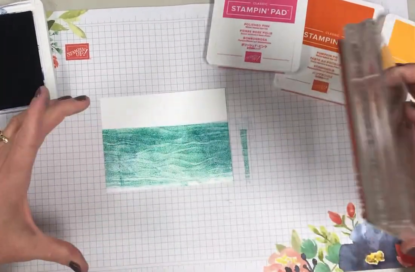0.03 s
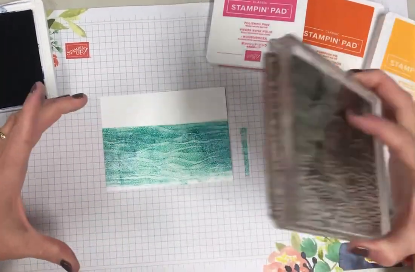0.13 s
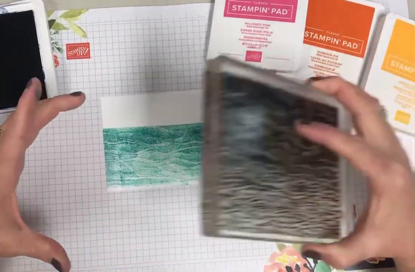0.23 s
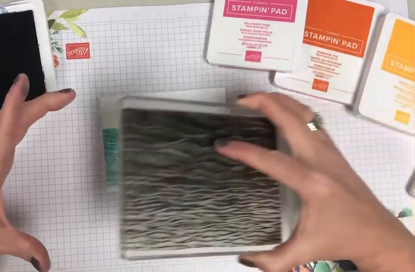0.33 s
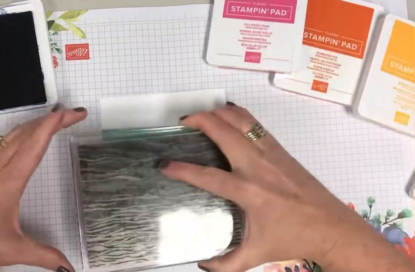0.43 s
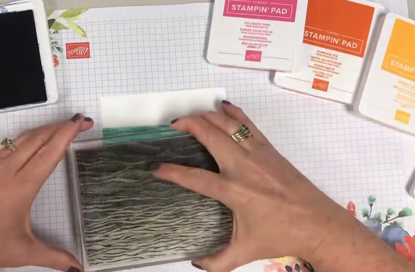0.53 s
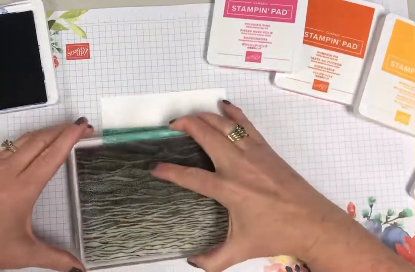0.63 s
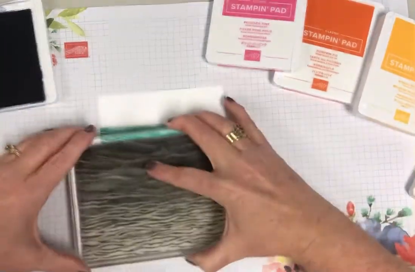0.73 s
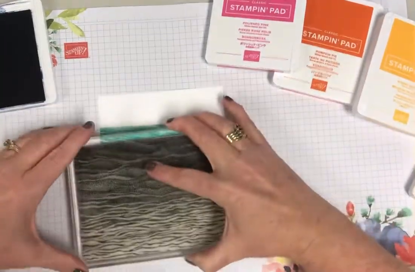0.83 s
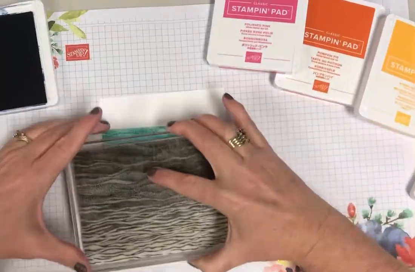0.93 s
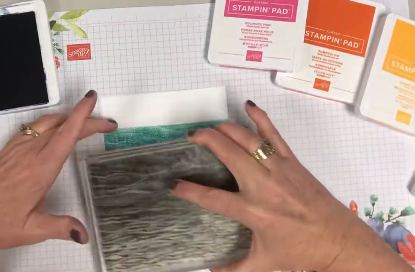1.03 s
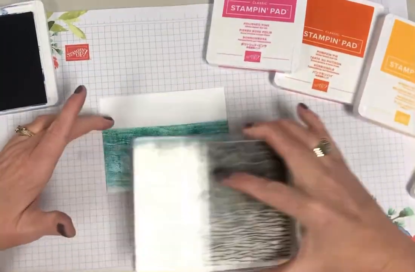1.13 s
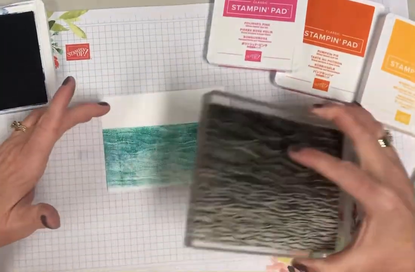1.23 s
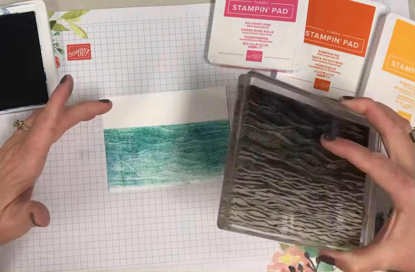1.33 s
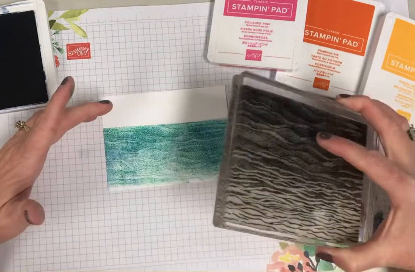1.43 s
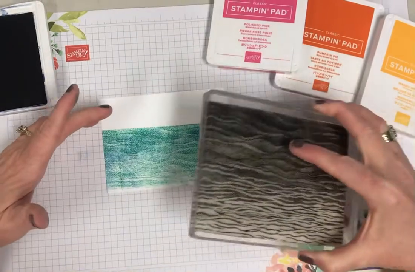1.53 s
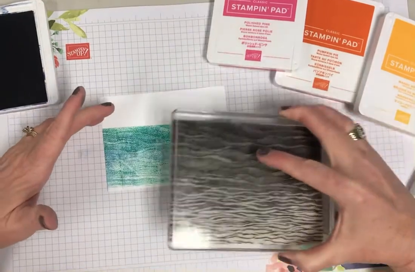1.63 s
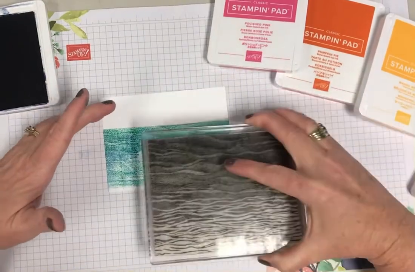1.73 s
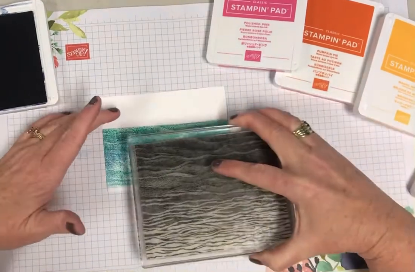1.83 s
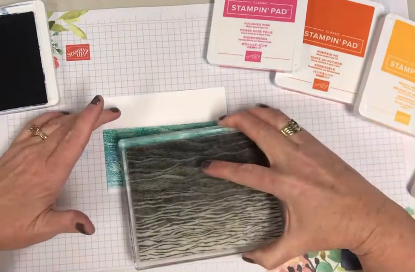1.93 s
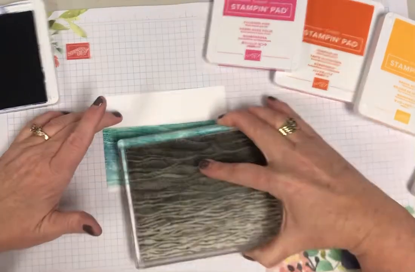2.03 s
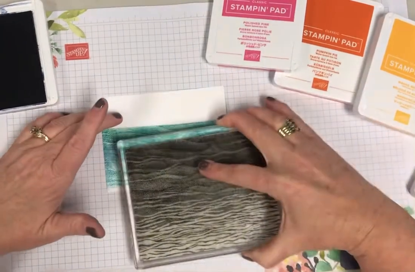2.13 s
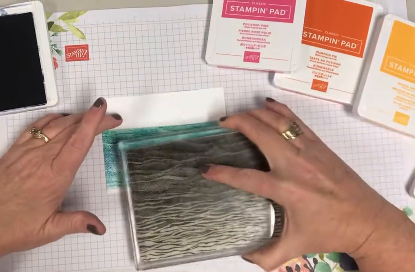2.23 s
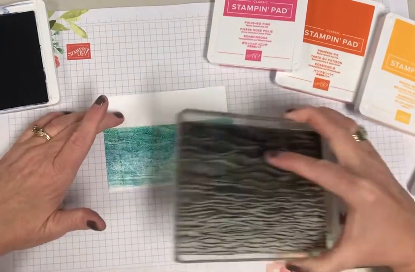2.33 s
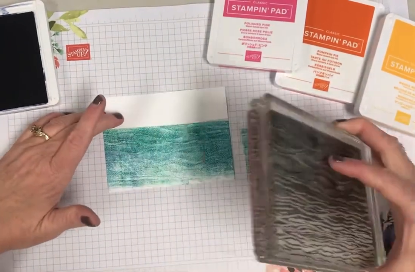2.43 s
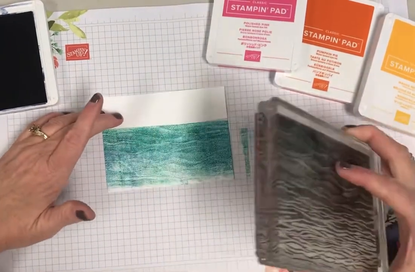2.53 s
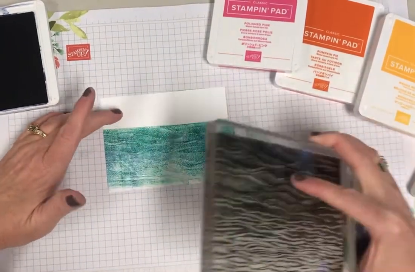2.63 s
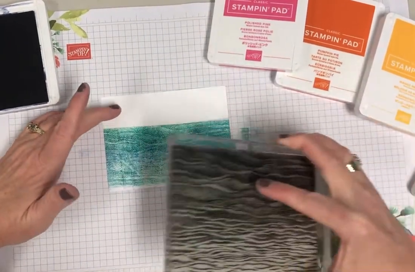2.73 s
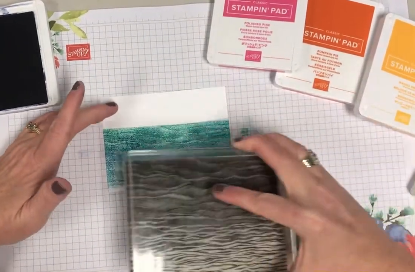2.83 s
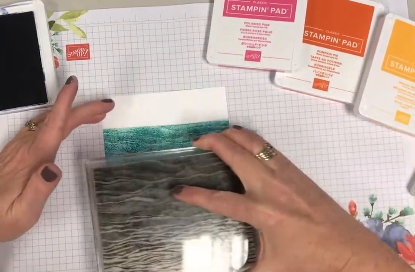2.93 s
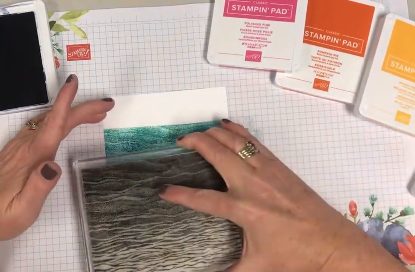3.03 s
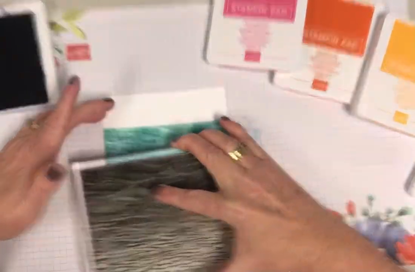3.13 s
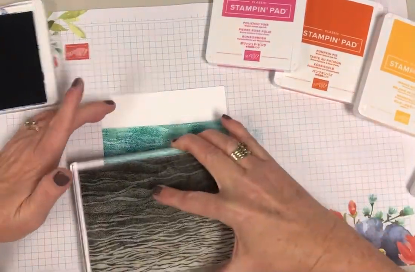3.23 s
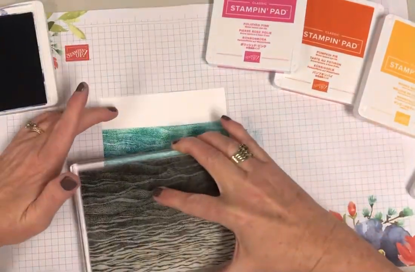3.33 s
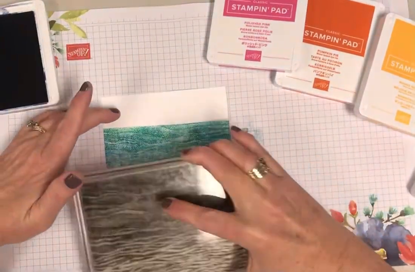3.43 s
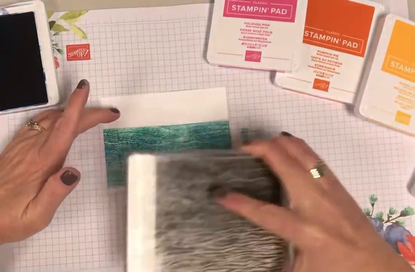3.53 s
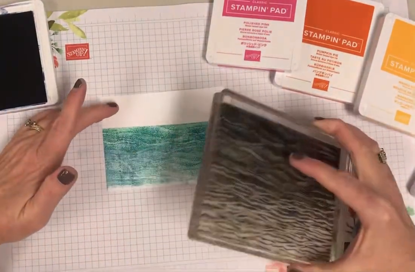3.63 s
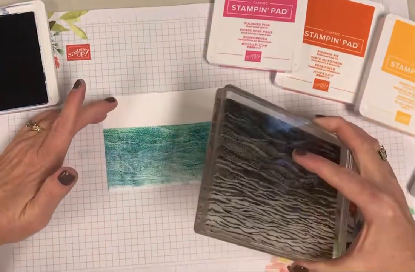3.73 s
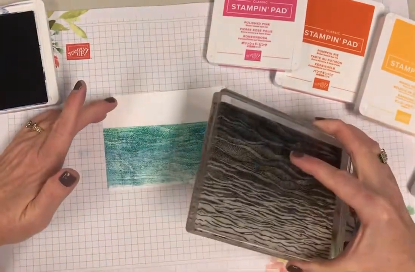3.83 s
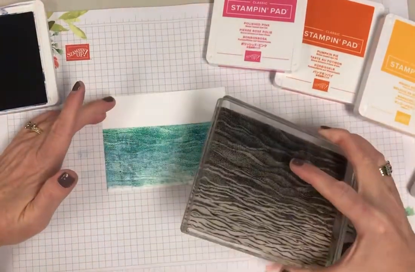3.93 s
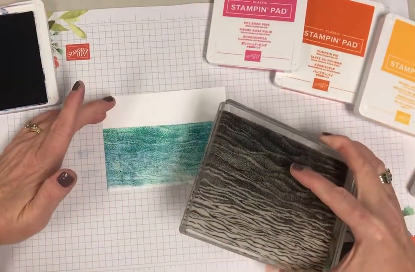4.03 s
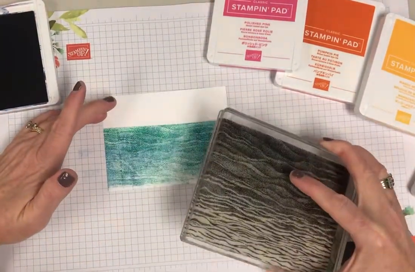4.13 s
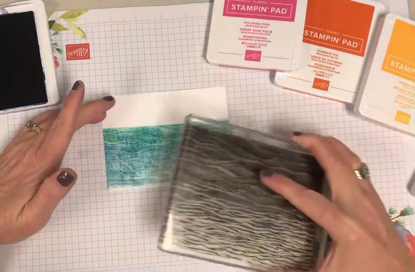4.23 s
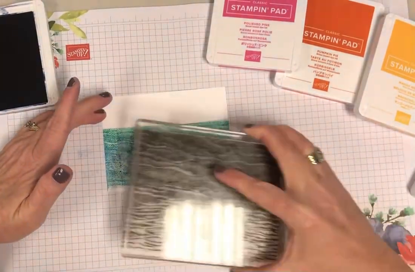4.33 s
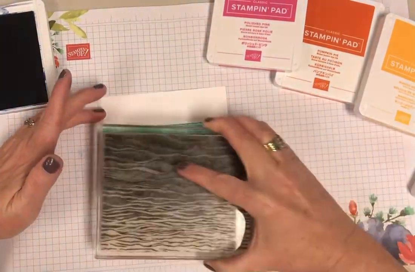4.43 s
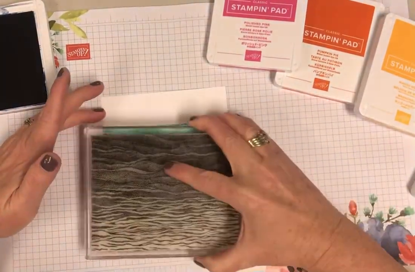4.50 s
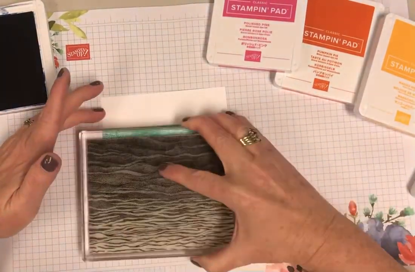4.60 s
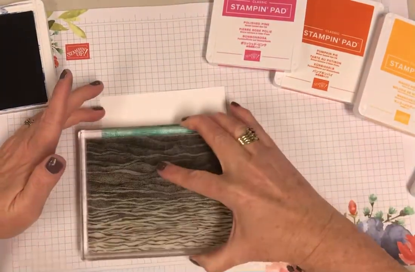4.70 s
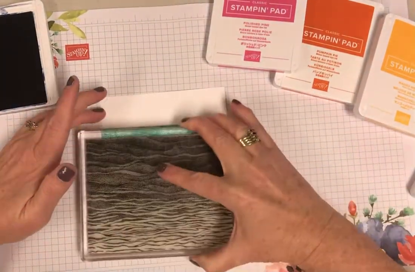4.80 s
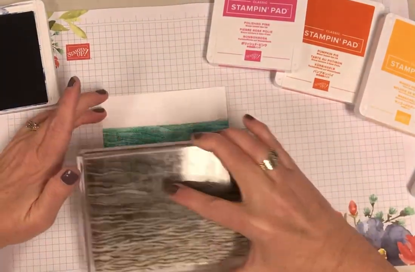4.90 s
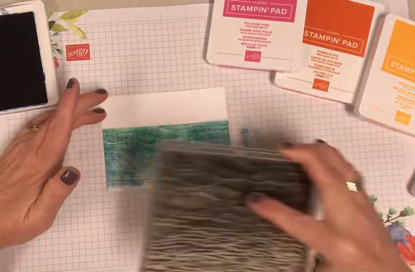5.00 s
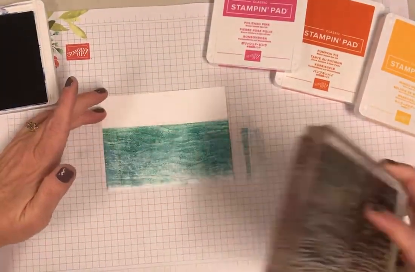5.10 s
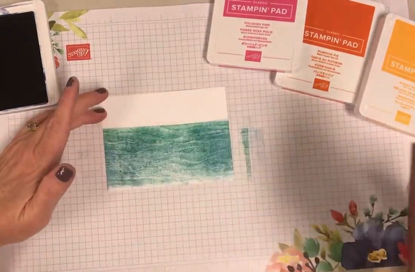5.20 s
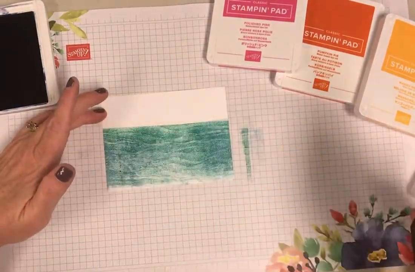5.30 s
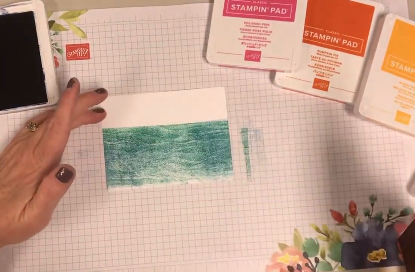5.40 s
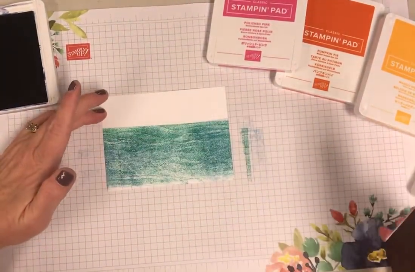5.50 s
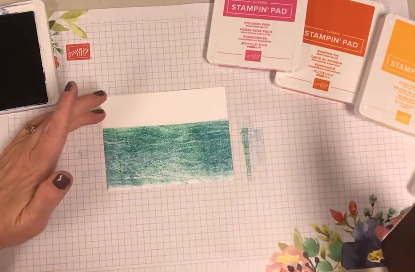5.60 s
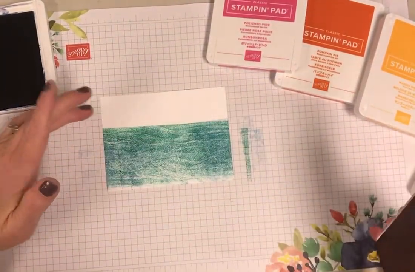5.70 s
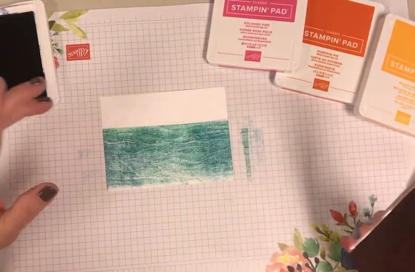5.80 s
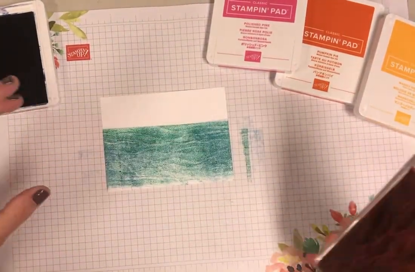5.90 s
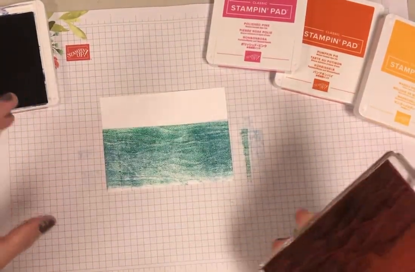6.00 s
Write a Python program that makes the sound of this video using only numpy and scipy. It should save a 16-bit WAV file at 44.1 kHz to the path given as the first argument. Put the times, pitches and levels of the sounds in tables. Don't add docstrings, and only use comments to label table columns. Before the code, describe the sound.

A rubber stamp on a heavy plastic block thuds onto card four times, with papery rubs and faint ticks, then a sharp snap.

```python
import sys
import numpy as np
from scipy import signal
from scipy.fft import rfft, irfft, next_fast_len
from scipy.io import wavfile
from scipy.ndimage import uniform_filter1d

SR = 44100
rng = np.random.default_rng(int(sys.argv[2]) if len(sys.argv) > 2 else 0)


def volts_from_db(level):
    exponent = np.asarray(level, float) / 20
    return 10 ** exponent


def inscribe(sig):
    pcm = np.round(np.clip(np.atleast_2d(sig).T, -1, 1) * 32767)
    wavfile.write(sys.argv[1], SR, pcm.astype(np.int16))


N = 267025

# (frequency [Hz], density [dB per Hz])
AIR_COLOUR = [(47, -20), (80, 2.5), (329, -11), (429, -10.5), (458, -14.5), (761, -17), (1110, -14),
              (1610, -20), (3340, -25.5), (15700, -29.5)]
# (time [s], level [dB])
TABLE_SWAYS = [
    (2.24, -59),
    (3.34, -58),
    (4.85, -70),
    (5.48, -59),
]
# (time [s], ring level [dB], first ring [Hz], second ring [Hz], click level [dB])
NAIL_TICKS = [
    (.063, -60.5, 5900, 3700, -72),
    (0.272, -54, 2700, 5840, -55),
    (1.811, -70, 3060, 6000, -61),
    (2.5301, -47, 1300, 1176, -60),
    (2.5296, -53.5, 3700, 5600, -66),
    (5.0135, -57.5, 1020, 1080, -71),
    (5.9305, -63, 11700, 14000, -54.5),
]
# (frequency [Hz], t60 [s])
ROOM_DECAY = [(150, 0.62), (400, 0.53), (1000, 0.52), (3500, 0.63), (7000, 0.51), (13000, 0.39)]
# (start [s], length [s], rising share [0-1], level [dB], fibre gain [dB])
PAPER_RUBS = [(0.184, 0.38, 0.46, -64, -7), (0.752, 0.13, 0.31, -68, -4), (.84, .14, 0.27, -61.5, -3),
              (.95, 0.084, 0.4, -65.5, -3.5), (1.044, 0.33, 0.206, -60, -3.5),
              (1.694, 0.54, 0.25, -76, -1.5), (2.23, 0.32, .3, -70.5, -0.5),
              (2.582, 0.56, 0.3, -70.5, -3.5), (3.361, 0.33, 0.25, -68.5, -2.5),
              (4.218, 0.34, 0.35, -73.5, -1), (4.779, 0.072, .2, -74, -15), (4.86, 0.2, 0.29, -75, 2)]
# (frequency [Hz], density [dB per Hz])
SCUFF_COLOUR = [(300, -5.5), (900, -2), (2800, 0), (4200, 1), (6500, -1.5), (9000, -25)]
# (frequency [Hz], density [dB per Hz])
FIBRE_COLOUR = [(4500, -23), (7000, 0.5), (10500, 1), (16000, -5.5)]
# (time [s], level [dB], length [ms])
AIR_BURSTS = [(0.645, -50.5, 9.9), (0.657, -46, 15.6), (0.668, -43, 12.7), (.684, -44.5, 18.3),
              (0.772, -54, 20), (0.786, -56.5, 20), (.882, -57, 11.5), (.99, -55, 15), (1.941, -54.5, 12),
              (1.954, -49, 17), (1.9598, -35.5, 7.1), (1.9699, -29, 8.5), (1.982, -28.5, 9.4),
              (1.995, -54, 7), (2.187, -54.5, 4.8), (3.1088, -35.5, 13.4), (3.12, -17.5, 3.15),
              (3.13, -33.5, 10.1), (3.14, -47, 14), (3.301, -56, 6), (3.309, -50, 3.6),
              (4.5833, -48.5, 13.6), (4.601, -52.5, 6.4), (4.615, -56, 3.3), (4.786, -64.5, 14)]
# (frequency [Hz], density [dB per Hz])
SLAP_COLOUR = [(290, -23.5), (500, 0.5), (638, -5.5), (1290, -11), (1650, -12), (1850, -19), (2970, -16),
               (5430, -22.5), (7780, -35), (8720, -38.5), (15500, -44)]
# (frequency [Hz], density [dB per Hz])
HISS_COLOUR = [(2500, -47), (5500, -11), (9000, 1.5), (16000, -13)]
# (time [s], landing level [dB], peeling level [dB])
LANDING_HISS = [
    (.6, -13.5, -19),
    (1.9, -19, -4.5),
    (3.05, -17.5, -8.5),
    (4.5, -11.5, -2),
]
# (frequency [Hz], width [Hz], level [dB])
BLOCK_RINGS = [(6000, 420, -1), (9200, 220, -1.5), (13800, 200, 7.5)]
# (time [s], force [dB], softness [ms])
LANDING_PUSHES = [(0.6515, -19.5, 0.62), (0.6606, -28.3, 0.38), (0.6645, -9.6, 1.43), (0.6699, 0.1, 2.0),
                  (0.6816, -24.0, 0.39), (0.6993, -31.2, 0.17), (1.9466, -12.1, 1.74),
                  (1.9564, -14.9, 1.17), (1.963, -12.6, 0.17), (1.9743, -10.7, 0.54), (1.9814, -14.3, 0.52),
                  (3.1159, -7.8, 0.17), (3.122, -17.2, 0.25), (4.5851, -25.7, 1.27), (4.5921, -19.8, 0.87),
                  (4.5968, -7.7, 2.0), (4.6051, -15.4, 0.88), (4.6106, -8.5, 1.52), (4.6205, -24.7, 0.39)]
# (time [s], force [dB], softness [ms])
ROCKING_PUSHES = [(0.785, -37, 0.15), (0.871, -46.5, 0.17), (.925, -47.5, 0.12), (.992, -47, .18),
                  (1.006, -41, 0.24), (1.022, -43, 0.12), (1.043, -54, 0.13), (2.101, -24.5, 1.64),
                  (2.189, -34, 0.59), (2.341, -46, 0.89), (3.234, -30, 0.83), (3.311, -34.5, 1.3),
                  (3.47, -38.5, 1.9), (4.788, -39, 0.91), (5.0, -50.5, 0.48)]
# (frequency [Hz], level [dB], t60 [s], side of the node line [+1 or -1])
TABLE_MODES = [(45.5, -13.5, 0.28, 1), (60.4, -34.8, 0.8, -1), (86.7, 10.5, 0.09, -1),
               (95.5, 8.3, 0.086, 1), (100.4, -18.7, 0.688, 1), (109.0, -11.6, 0.239, 1),
               (137.5, -20.8, 0.165, -1), (149.6, -29.2, 0.261, 1), (160.3, -37.5, 0.8, 1),
               (176.5, 1.8, 0.029, 1), (182.4, -23.3, 0.182, -1), (197.8, -35.0, 0.79, 1),
               (220.9, -22.2, 0.287, 1), (244.7, -28.6, 0.351, 1), (261.2, -17.4, 0.132, 1),
               (289.7, -20.9, 0.216, 1), (307.1, -45.8, 0.702, 1), (323.0, -17.6, 0.056, -1),
               (379.4, -7.7, 0.02, 1), (385.0, -13.0, 0.073, -1), (419.1, -20.6, 0.112, -1),
               (448.9, -27.3, 0.159, -1), (532.0, -23.8, 0.115, 1), (543.4, -13.8, 0.037, -1),
               (656.0, -32.3, 0.118, -1)]
# (frequency [Hz], level [dB])
THUD_COLOUR = [(60, -12.5), (100, 28), (160, 24.5), (280, 25.5), (450, 25.5), (700, 6), (1200, -14)]
# (time [s], level [dB])
SNAP_BLOWS = [
    (6.0079, -20),
    (6.0095, -24.5),
    (6.0111, -32),
    (6.0137, -44),
]
# (frequency [Hz], width [Hz], level [dB])
HOUSING_COLOUR = [(3076, 3200, 3.5), (4974, 400, -3), (7670, 540, -3.5), (8960, 1200, 0), (10390, 620, -7)]

AIR_DB = -66
DEEP_HUM_DB, HIGH_HUM_DB = (-64.5, -78), (-83, -73)
CHANGE_S, FADE_S = 2.8, 0.2
SWAY_S, SWAY_EDGE_DB = 0.14, -21
RING_S, RING_FALLS = 0.035, 0.95
LUMPY_DB = 3
HOLD, EDGE_DB, SAG_DB = 0.42, -17.5, -2
LIFT_S = 0.14
THIN_HZ = 700
TOP_HZ = 15830


def unit(x):
    return x / np.sqrt(np.mean(x ** 2) + 1e-20)


def along(points, hz):
    f, v = np.transpose(points)
    return np.interp(np.log(hz + 1), np.log(f + 1), v)


def fader(rows):
    s, db = np.transpose(rows)
    return volts_from_db(np.interp(np.arange(N) / SR, s, db, -120, -120))


def filtered(x, response):
    m = next_fast_len(len(x) + SR // 4)
    return irfft(rfft(x, m) * response(np.fft.rfftfreq(m, 1 / SR)), m)[:len(x)]


def noise(spectrum, patchy_db):
    z = signal.stft(rng.standard_normal(N), nperseg=512)[2]
    patches = uniform_filter1d(rng.standard_normal(z.shape), size=6, axis=0)
    patches = uniform_filter1d(patches, size=10, axis=1)
    patchy = signal.istft(z * volts_from_db(patchy_db * unit(patches)), nperseg=512)[1][:N]
    return unit(filtered(patchy, lambda hz: volts_from_db(along(spectrum, hz))))


def grain(size, depth_db):
    return volts_from_db(depth_db * unit(uniform_filter1d(rng.standard_normal(N), size=size)))


def ring(f, hz, width):
    return 1j * f * width / (hz * hz - f * f + 1j * f * width)


def add(track, s, x):
    part = track[round(s * SR):][:len(x)]
    part += x[:len(part)]


def background():
    def hum(before, after):
        return fader([(0, before), (CHANGE_S, before), (CHANGE_S + FADE_S, after), (N / SR, after)])

    sway = np.zeros(N)
    for s, db in TABLE_SWAYS:
        sway += fader([(s - SWAY_S, db + SWAY_EDGE_DB), (s, db), (s + SWAY_S, db + SWAY_EDGE_DB)])
    deep_colour = [(20, -40), (38, -8), (50, 0), (64, -5), (85, -50)]
    high_colour = [(35, -40), (55, -6), (66, 0), (76, -8), (100, -50)]
    deep = (hum(*DEEP_HUM_DB) + sway) * noise(deep_colour, patchy_db=0.6)
    high = hum(*HIGH_HUM_DB) * noise(high_colour, patchy_db=0.6)
    return volts_from_db(AIR_DB) * noise(AIR_COLOUR, patchy_db=-0.76) + deep + high


def ticks():
    out, t = np.zeros(N), np.arange(SR // 20) / SR
    for s, db, hz, second_hz, click_db in NAIL_TICKS:
        tones = np.sin(2 * np.pi * hz * t) + volts_from_db(-3.0) * np.sin(2 * np.pi * second_hz * t)
        click = volts_from_db(click_db - 60 * t / 0.008) * np.diff(rng.standard_normal(len(t) + 1))
        t60 = RING_S * (1000 / hz) ** RING_FALLS
        add(out, s, volts_from_db(db - 60 * t / t60) * tones + click)
    return out


def room(x):
    out = np.zeros(N)
    tails, lumps = rng.standard_normal((2, 4, SR))
    for k, (start, stop) in enumerate(((0, 1.5), (1.5, 2.8), (2.8, 4), (4, 7))):
        hz, t, z = signal.stft(tails[k], SR, nperseg=256)
        treble = np.clip(hz / 2000, 0, 1)[:, None]
        echoes = LUMPY_DB * unit(lumps[k, :len(t)]) * treble
        decay = 60 * t / along(ROOM_DECAY, hz)[:, None]
        tail = signal.istft(z * volts_from_db(echoes - decay), SR, nperseg=256)[1]
        part = x[round(start * SR):round(stop * SR)]
        add(out, start + 0.012, signal.fftconvolve(part, tail / np.linalg.norm(tail)))
    return out


def stroke(s, length, rise, db):
    top = s + np.clip(rise, 0, 1) * length
    end = s + length
    return fader([(s, db + EDGE_DB), (top, db), (top + HOLD * (end - top), db + SAG_DB), (end, db + EDGE_DB)])


def rubbing():
    grit = grain(90, 1.8)
    scuff, fine = np.zeros(N), np.zeros(N)
    for *row, fibre_db in PAPER_RUBS:
        envelope = stroke(*row)
        scuff += envelope
        fine += envelope * volts_from_db(fibre_db)
    paper = unit(grit * noise(SCUFF_COLOUR, patchy_db=2.0))
    fibres = unit(grit * noise(FIBRE_COLOUR, patchy_db=-0.5))
    return volts_from_db(1.2) * scuff * paper + volts_from_db(3.3) * fine * fibres


def slaps():
    shape, clicks, t = np.zeros(N), np.zeros(N), np.arange(SR // 8) / SR
    for s, db, length_ms in AIR_BURSTS:
        burst = volts_from_db(db - 8.7 * 1000 * t / length_ms) * (1 - np.exp(-t / 0.0007))
        add(shape, s, burst)
        add(clicks, s + length_ms / 2000, [np.linalg.norm(burst)])
    fizz = np.zeros(N)
    for s, landing_db, peeling_db in LANDING_HISS:
        fizz[round(s * SR):] = volts_from_db(landing_db)
        fizz[round((s + LIFT_S) * SR):] = volts_from_db(peeling_db)
    crackle = grain(50, 1.7)
    breath = noise(SLAP_COLOUR, patchy_db=1.5) + fizz * noise(HISS_COLOUR, patchy_db=2.0)
    near = filtered(shape * unit(crackle) * breath, lambda f: 1j * f / (THIN_HZ + 1j * f))

    def block(f):
        return 1 + sum(volts_from_db(db) * ring(f, hz, width) for hz, width, db in BLOCK_RINGS)

    body = filtered(clicks, lambda hz: unit(volts_from_db(along(SLAP_COLOUR, hz))))
    hiss = filtered(fizz * clicks, lambda hz: unit(volts_from_db(along(HISS_COLOUR, hz))))
    return near, filtered(body + hiss, block)


def table():
    force, t = np.zeros(N), np.arange(SR // 20) / SR
    for s, db, soft_ms in list(LANDING_PUSHES) + list(ROCKING_PUSHES):
        push = t * t * np.exp(-1000 * t / soft_ms)
        add(force, s, volts_from_db(db) * push / push.sum())
    hz, db, t60, side = np.transpose(TABLE_MODES)[:, :, None]
    w = 2 * np.pi * hz
    damping = np.log(1000) / t60

    def modes(f):
        jw = 2j * np.pi * f
        return jw * np.sum(side * volts_from_db(db) * w / ((jw + damping) ** 2 + w * w), axis=0)

    boom = volts_from_db(30) * filtered(force, modes)
    return boom, filtered(force, lambda f: volts_from_db(along(THUD_COLOUR, f)))


def snap():
    blows, edges, t = np.zeros(N), np.zeros(N), np.arange(SR // 200) / SR
    for s, db in SNAP_BLOWS:
        add(blows, s, [volts_from_db(db)])
        add(edges, s, volts_from_db(db - 18.5 - 60 * t / 0.004) * np.diff(rng.standard_normal(len(t) + 1)))
    highpass = signal.cheby1(5, 1, 2720, "high", fs=SR, output="sos")
    thin = signal.sosfilt(highpass, [blows, edges])
    body = filtered(blows, lambda f: volts_from_db(-9) * ring(f, hz=1500, width=1100))
    first = filtered(thin[0], lambda f: volts_from_db(17) * ring(f, hz=3100, width=420))
    treble = filtered(sum(thin), lambda f: volts_from_db(9.5) * ring(f, hz=4300, width=2400))
    return body + first + treble


def scene():
    hard = ticks() + snap()
    air, clicks = slaps()
    boom, thud = table()
    wet = room(thud + volts_from_db(-10) * clicks + volts_from_db(-21.0) * hard)
    return (boom + air + hard + wet + rubbing() + background())[None]


def roll_off(x):
    return signal.sosfilt(signal.butter(12, 16760, fs=SR, output="sos"), x)


def record(dry):
    def colour(hz):
        bumps = sum(db / (1 + (2 * (hz - fc) / width) ** 2) for fc, width, db in HOUSING_COLOUR)
        return volts_from_db(bumps - 22 * (hz > TOP_HZ))

    return roll_off(filtered(dry[0], colour)[None])


dry = scene()
out = record(dry)
inscribe(out)
```